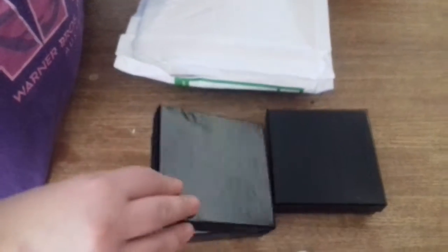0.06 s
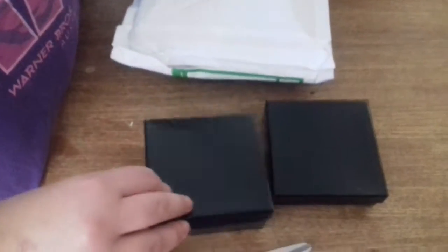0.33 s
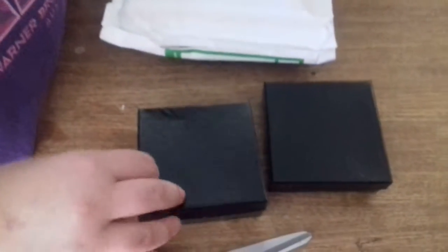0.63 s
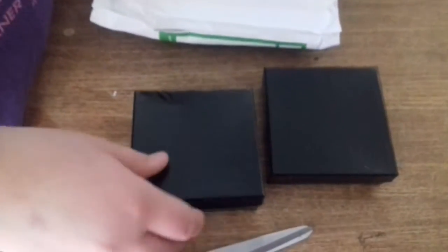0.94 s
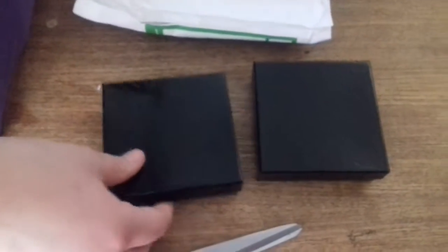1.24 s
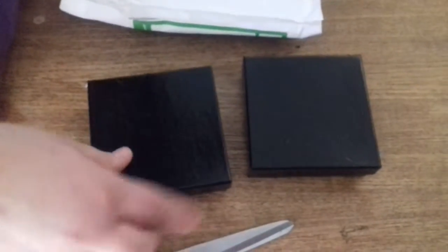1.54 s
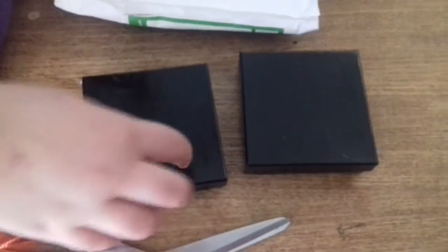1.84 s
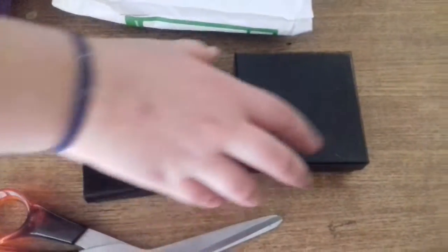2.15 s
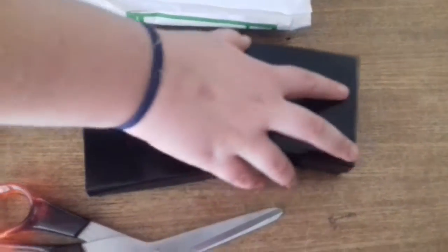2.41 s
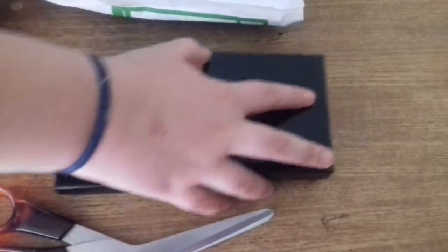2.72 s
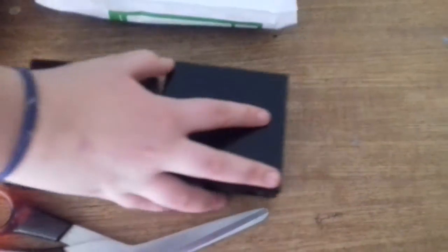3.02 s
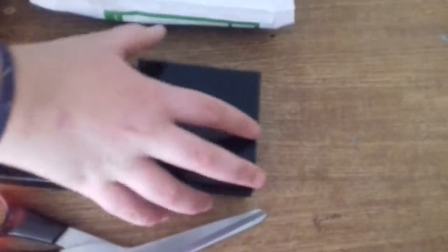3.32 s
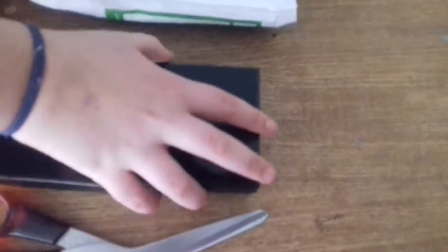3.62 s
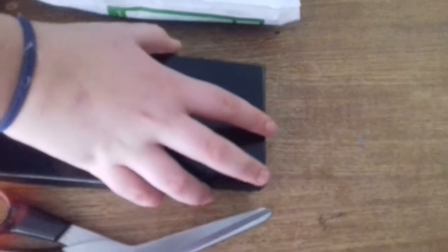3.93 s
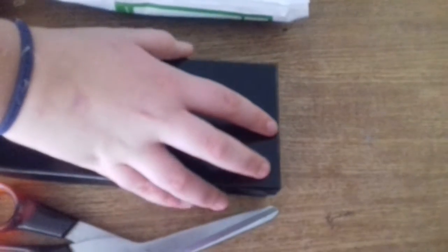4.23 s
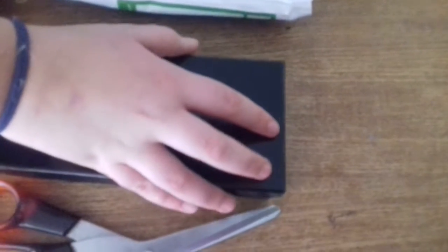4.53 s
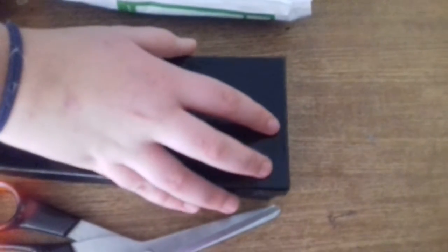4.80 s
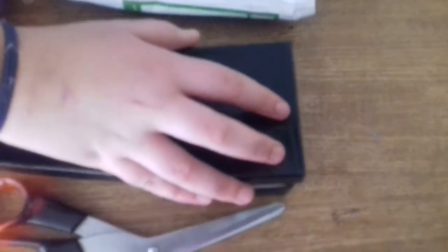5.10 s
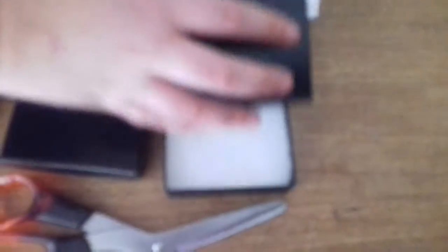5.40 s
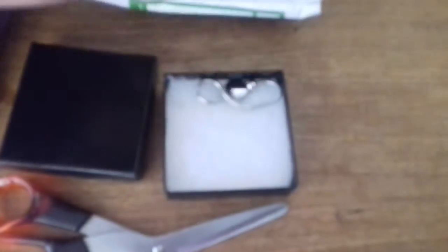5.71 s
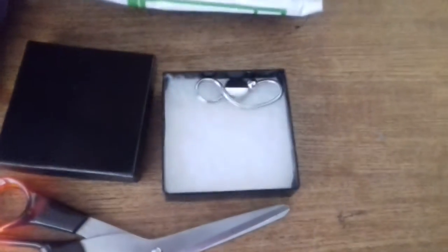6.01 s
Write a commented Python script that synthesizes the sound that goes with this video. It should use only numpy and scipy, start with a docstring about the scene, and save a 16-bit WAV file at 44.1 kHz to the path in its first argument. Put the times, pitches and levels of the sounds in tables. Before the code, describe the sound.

Small cardboard boxes are handled on a wooden table, close to the microphone, over a faint room drone and hiss. In the first 0.8 seconds a lid is pressed shut with a quick run of dry clicks and short rasps, strongest near 0.4 seconds. From about 1.3 to 2 seconds come soft, hollow taps and low rubbing. Between 2.3 and 3.7 seconds fingers slide faintly over the card, with scattered light taps. Small knocks follow from 4 seconds, with a firm hollow one at 4.3 and a softer one near 4.8. At about 5.2 seconds the second lid pops off with a tight cluster of clicks, the loudest moment, and a brief scrape. A few very faint ticks trail off by around 6 seconds. Every contact is short and damped, with little echo.

```python
"""Two small cardboard jewelry boxes, handled on a wooden table close to a near-mono camera microphone.
A lid is pressed shut, fingers tap and rub the card, and the second lid is worked loose until it pops off.
Every contact rings the same damped card panels: hardness tilts the sound and the struck spot rings
above the rest. Sliding card rasps in tiny slips. Behind it all, a quiet room drones under faint hiss."""
import sys
import numpy as np
from scipy import signal
from scipy.fft import rfft, irfft, next_fast_len
from scipy.io import wavfile
from scipy.ndimage import map_coordinates

SR = 44100
rng = np.random.default_rng(int(sys.argv[2]) if len(sys.argv) > 2 else 0)


def waveform_to_disk(signal):
    """Save audio, clipped to [-1, 1], as 16-bit WAV at the path in sys.argv[1]."""
    frames = np.transpose(np.atleast_2d(signal))
    scaled = np.clip(frames, -1, 1) * 32767
    samples = np.round(scaled).astype(np.int16)
    wavfile.write(sys.argv[1], SR, samples)


N = 275681


def amp(db):
    """Decibels to gain."""
    return 10 ** (np.asarray(db) / 20)


def unit(x):
    """Scale to rms 1."""
    return x / np.sqrt(np.mean(x ** 2) + 1e-20)


def along(points, hz):
    """Read (Hz, value) points on a log axis."""
    point_hz, values = np.transpose(points)
    return np.interp(np.log(hz + 1), np.log(point_hz + 1), values)


def hump(hz, centre_hz, octaves):
    """A bell curve of height 1 on a log axis."""
    return np.exp(-(np.log2((hz + 1) / centre_hz) / octaves) ** 2)


def filtered(x, response):
    """Zero-phase filter whose gain is response(hz)."""
    n = x.shape[-1]
    size = next_fast_len(n + 8192)
    return irfft(rfft(x, size) * response(np.fft.rfftfreq(size, 1 / SR)), size)[..., :n]


def coloured(x, spectrum):
    """Causal (minimum-phase) filter with the given (Hz, dB) gain."""
    size = next_fast_len(2 * len(x))
    gain = amp(along(spectrum, np.fft.rfftfreq(size, 1 / SR)))
    cepstrum = irfft(np.log(gain), size)
    cepstrum[1:size // 2] *= 2
    cepstrum[size // 2 + 1:] = 0
    return irfft(rfft(x, size) * np.exp(rfft(cepstrum)), size)[:len(x)]


# The quiet room at the microphone. Each row: frequency in Hz, relative noise density in dB.
ROOM_NOISE = [(12, -37), (20, -21), (27, -19), (93, -8.5), (208, -3), (290, -8), (861, -13.5), (1140, -15),
              (2700, -15.5), (5420, -33), (15600, -36.5)]
# Humps on that noise. Each row: centre in Hz, width in Hz, lift in dB.
DRONE_HUMPS = [(99.6, 5.1, 11.5), (147.9, 7.5, 11.5), (267.5, 21, 9), (870.4, 9.8, 14), (2650, 1200, 1),
               (4020, 880, 6)]
# Stereo width of the noise, humps aside. Each row: frequency in Hz, side minus mid in dB.
NOISE_WIDTH = [(60, -14), (110, -16), (200, -18.5), (380, -12.5), (700, -10.5), (1290, -8), (2380, -9.5),
               (4400, -0.5), (8120, 0), (15000, 0)]


def room_tone(level_db):
    """A steady room drone, alike in both channels, under microphone hiss that is not."""
    def drone_db(hz):
        return sum(db / (1 + (2 * (hz - centre) / width) ** 2) for centre, width, db in DRONE_HUMPS)

    mid = filtered(rng.standard_normal(N), lambda hz: amp(along(ROOM_NOISE, hz) + drone_db(hz)))
    side = filtered(rng.standard_normal(N), lambda hz: amp(along(ROOM_NOISE, hz) + along(NOISE_WIDTH, hz)))
    return amp(level_db) * unit(np.array([mid + side, mid - side]))


# Card sliding on card, heard close. Each row: frequency in Hz, relative noise density in dB.
CARD_RASP = [(120, -41), (400, 1), (850, -6), (1150, -4), (1700, -6.5), (2700, -4), (3400, -9.5),
             (4400, -17), (5100, -25.5), (7000, -30.5), (10000, -36.5), (15000, -39)]


def grazes(level_db, rise_s):
    """The surfaces graze just before they meet, leading into each contact with a short rising rasp."""
    out, n = np.zeros(N + SR), int(rise_s * SR)
    for start, *_ in CONTACTS:
        rasp = unit(filtered(rng.standard_normal(SR // 16), lambda hz: amp(along(CARD_RASP, hz))))
        out[round(start * SR) - n:][:n] += amp(level_db) * rasp[:n] * np.linspace(0, 1, n)
    return out[:N]


# The modes of a box. Each row: frequency in Hz, relative level in dB, seconds to fall by 60 dB.
BOX_MODES = [(235, -11, 0.19), (427, 4.5, 0.018), (655, -13, 0.058), (748, -5.5, 0.042), (1030, -11, 0.027),
             (1330, -4, 0.008), (1410, 8, 0.016), (2040, -13, 0.035), (2430, -24, 0.017),
             (2720, -4.5, 0.026), (2900, 6, 0.016), (3650, 2.5, 0.026), (4330, 1.5, 0.033)]
# Card passes little treble. Each row: frequency in Hz, gain in dB.
CARD_RESPONSE = [(60, -27), (250, 1), (1000, 3.5), (1300, 1), (1650, -4), (2200, 10), (2750, 2), (3250, -5),
                 (3750, -9), (4400, -13.5), (5100, -18), (6800, -23.5), (9000, -40), (15000, -40)]


def box_ring(t, spot_hz, spot_db, spot_t60, detune, scatter_db, crack_db, crunch_db, crunch_t60):
    """One blow on a box: a crack, a crunch of fibres, damped modes and the ring of the struck spot."""
    hz, db, t60 = np.transpose(BOX_MODES)[:, :, None]
    shift, strength = rng.standard_normal((2, len(BOX_MODES), 1))  # the grip alters each mode a little
    envelopes = amp(db + scatter_db * strength - 60 * t / t60)
    modes = envelopes * np.cos(2 * np.pi * hz * (1 + detune * shift) * t)
    spot = amp(spot_db - 60 * t / spot_t60) * np.cos(2 * np.pi * spot_hz * t)
    crack = amp(crack_db) * (t == 0)
    crunch = amp(crunch_db - 60 * t / crunch_t60) * rng.standard_normal(len(t))
    return coloured(modes.sum(axis=0) + spot + crack + crunch, CARD_RESPONSE)


def near_reflections(x, level_db, t60):
    """Hand, table and nearby things answer within milliseconds, differently for each place of contact."""
    t = np.arange(len(x)) / SR
    echoes = rng.standard_normal(len(t)) * amp(-60 * t / t60) * (t > .004)
    return x + amp(level_db) * signal.fftconvolve(x, echoes / np.linalg.norm(echoes))[:len(x)]


# The box's registers: thud, hollow, panel, lid, rim, click. Each row: low and high edge in Hz.
REGISTER_EDGES = [(150, 550), (550, 900), (900, 1700), (1700, 3300), (3300, 4700), (4700, 15000)]
# A usual blow in those registers; a heavy one flexes the panels but crushes the card, dulling its click.
# Each row: centre in Hz, relative level in dB, dB gained per dB of extra force.
REGISTER_BALANCE = [(344, -11.5, -0.13), (700, -11.5, 0.28), (1185, -8, 0.41), (2480, -6, 0.29),
                    (4000, -19.5, 0.07), (7000, -29.5, -0.42)]
# Fingers, lids and table meeting close to the microphone; a spot that no finger damps rings out.
# Each row: start in seconds, relative level in dB, resonance of the struck spot in Hz,
# its relative ring in dB, hardness in dB per octave.
CONTACTS = [(0.0413, -30, 1500, 11, 2.0), (0.0584, -36.5, 1584, 20, 0.0), (0.1326, -39.5, 1540, 9, -1.0),
            (0.142, -35.5, 2070, 6, -0.5), (0.153, -45, 2120, -1, 4.5), (0.1613, -34, 2200, 1, 4.5),
            (0.3806, -30, 1160, 4, 3), (0.385, -30, 2320, 3, 0), (0.4149, -40, 2410, 1, 1),
            (0.4716, -44.5, 754, 5, -2), (0.4925, -45.0, 970, 10, -3), (0.5221, -45.0, 2350, 14, -4.5),
            (0.5292, -30.5, 1480, -2, -1.0), (0.7403, -34.5, 2830, 7, 5.5), (0.759, -39, 2030, 5, -2.5),
            (1.0644, -49, 2920, 6, -0.5), (1.279, -49, 700, 1, -4), (1.315, -50.0, 630, 11, 2),
            (1.355, -51.5, 680, 6, -2), (1.4273, -39.5, 724, 21, 2.5), (1.433, -39.5, 700, 3.5, -1.0),
            (1.5154, -46.5, 684, 0, -4.5), (1.5582, -49.5, 1400, 8, -0.5), (1.5875, -50.5, 775, 13, 3.5),
            (1.6059, -48, 552, 8, 1.5), (1.7108, -50.5, 1410, 4, -2.5), (1.7648, -35, 1420, 3, -2),
            (1.9464, -43.5, 2600, 6.5, 2.5), (1.9787, -47, 1430, 18, 1.5), (2.3713, -43.5, 805, 4, -3),
            (2.3931, -47, 1104, 11, -2.5), (2.6938, -45, 655, -1.5, -2), (2.732, -44, 1124, 15, 0),
            (2.8077, -41.0, 1160, 7.5, 1.5), (2.927, -41, 1190, 9, 2.5), (3.2921, -54.5, 1410, 16, -2.5),
            (3.5635, -49.0, 1110, 9, 0), (3.5927, -39.5, 1146, 1.5, -1.5), (3.6736, -52, 616, 8.5, 1.5),
            (4.0616, -44.5, 2140, 0.5, -0.5), (4.1191, -40, 766, 7.5, -2), (4.2429, -40.5, 785, 12, -4),
            (4.2575, -45, 2170, 3, -1), (4.3179, -26.5, 748, 12, -2), (4.32, -31, 1295, 14.5, -3.5),
            (4.7582, -41, 836, 17, -5), (4.805, -53.5, 820, 18, -4), (5.1398, -36.5, 980, 10, 2.5),
            (5.167, -22.5, 1010, 3, 1.5), (5.175, -28.5, 2670, 23, -2), (5.2271, -41.5, 2400, 1, 3),
            (5.3211, -52.5, 2350, 6, 0.5), (5.5526, -54.5, 970, 11, 1), (5.708, -52.0, 1070, 6, 2),
            (5.7394, -48.5, 1110, 2, 1.5)]


def contacts(gain_db, usual_blow_db, spot_db, spot_octaves, snap_db, snap_growth):
    """Hard contacts tilt bright, soft ones dull; heavy blows snap, light ones mostly crunch."""
    out, t = np.zeros(N + SR), np.arange(SR // 8) / SR
    bands = [signal.butter(3, edges, 'bandpass', fs=SR, output='sos') for edges in REGISTER_EDGES]
    lead, attack = SR // 100, int(.012 * SR)
    centre_hz, balance_db, growth = np.transpose(REGISTER_BALANCE)
    for start, db, spot_hz, ring_db, hardness in CONTACTS:
        force_db = db - usual_blow_db
        octaves = np.log2(centre_hz / spot_hz)
        lift_db = ring_db * np.exp(-(octaves / spot_octaves) ** 2)  # the spot lifts registers near it
        shares = amp(balance_db + growth * force_db + hardness * octaves + lift_db)
        ring = box_ring(t, spot_hz, spot_db + ring_db, spot_t60=0.019, detune=0.019, scatter_db=1.5,
                        crack_db=snap_db + snap_growth * force_db, crunch_db=16, crunch_t60=0.018)
        ring = np.pad(near_reflections(ring, level_db=-9.5, t60=0.053), (lead, 0))
        blow = sum(share * unit(signal.sosfiltfilt(band, ring)) for band, share in zip(bands, shares))
        blow /= blow[lead:][:attack].std()  # a blow's level counts over its first moments
        out[round(start * SR) - lead:][:len(blow)] += amp(db + gain_db) * blow
    return out[:N]


# Card or skin sliding over card, just in front of the microphone.
# Each row: start in seconds, length in seconds, level in dB, pitch of the rasp in Hz.
STROKES = [(.135, 0.029, -43.5, 2480), (0.17, 0.072, -56.5, 3300), (0.353, .022, -50, 2660),
           (.386, 0.041, -41, 2750), (0.413, .23, -56.5, 2660), (0.736, .014, -41, 2900),
           (1.333, .12, -57, 755), (1.412, 0.018, -49.5, 720), (1.491, 0.15, -60.5, 655),
           (1.719, 0.046, -51, 590), (2.347, 0.098, -57.5, 2500), (2.637, 0.041, -49.5, 2090),
           (2.744, 0.032, -51, 2600), (2.581, 0.5, -54.5, 2900), (2.952, 0.41, -56.5, 2800),
           (4.285, .027, -55, 3680), (4.315, 0.0089, -41.5, 3680), (4.321, 0.047, -52, 2150),
           (4.7, 0.028, -59, 3580), (5.133, 0.023, -42.5, 2500), (5.167, 0.035, -47, 1030),
           (5.17, 0.024, -45, 2650), (5.225, 0.044, -49.5, 2340), (5.19, .11, -57, 4100)]


def strokes(slips_per_s, slip_db, panel_db, wander_s, rim_hz, rim_db, uneven_db, catches_per_s):
    """Sliding card catches in tiny slips that sound one panel resonance and the edge of the lid."""
    out = np.zeros(N + SR)
    for start, length, db, rasp_hz in STROKES:
        n = int(length * SR)
        slips = rng.standard_normal(SR) * (1 + amp(slip_db) * (rng.random(SR) < slips_per_s / SR))
        catches = map_coordinates(rng.standard_normal(size=256), [np.arange(n) * catches_per_s / SR])
        pressure = amp(uneven_db * catches)
        prominence_db = panel_db / (1 + length / wander_s)  # a long stroke favours its panel less

        def response(hz):
            panel = prominence_db * hump(hz, rasp_hz, octaves=0.26)
            rim = rim_db * hump(hz, rim_hz, octaves=0.13)
            return amp(along(CARD_RASP, hz) + panel + rim)

        rasp = unit(filtered(slips[:n] * pressure, response))
        out[round(start * SR):][:n] += amp(db) * rasp * signal.windows.tukey(n, .6)
    return out[:N]


# Spells of fingering, faint even this close.
# Each row: start in seconds, length in seconds, lowest tick level in dB.
FIDGET_SPELLS = [(0, 6.2, -72), (1.249, 0.42, -71)]


def fidgets(ticks_per_spell, spread_db):
    """Fingertips shifting their grip make faint ticks at random moments of each spell."""
    out, t = np.zeros(N + SR), np.arange(SR // 16) / SR
    for start, length, db in FIDGET_SPELLS:
        for when, size in rng.random((ticks_per_spell, 2)):
            tick = box_ring(t, spot_hz=2500, spot_db=-19, spot_t60=0.014, detune=.04, scatter_db=6.0,
                            crack_db=35, crunch_db=18, crunch_t60=0.027)
            out[int((start + when * length) * SR):][:len(t)] += amp(db + spread_db * size) * unit(tick)
    return out[:N]


# The room around the table. Each row: frequency in Hz, seconds to fall by 60 dB.
ROOM_DECAY = [(200, 0.36), (1000, 0.18), (3000, 0.25), (10000, 0.39)]


def room_reverb(x, tail_db):
    """The walls add a short tail, whose midrange dies first."""
    hz, t, noise = signal.stft(rng.standard_normal(SR // 2), SR, nperseg=256)
    decay = amp(-60 * t / along(ROOM_DECAY, hz)[:, None])
    _, tail = signal.istft(noise * decay, SR, nperseg=256)
    tail *= np.clip(np.arange(len(tail)) / SR / 0.006, 0, 1)  # builds up over 6 ms
    return x + amp(tail_db) * signal.fftconvolve(x, tail / np.linalg.norm(tail))[:N]


def scene():
    """The boxes are close and straight ahead of the microphone; only the room tone has width."""
    handling = contacts(gain_db=-0.5, usual_blow_db=-40, spot_db=7, spot_octaves=0.55,
                        snap_db=21.5, snap_growth=0.47)
    handling += grazes(level_db=-57.5, rise_s=.018)
    handling += fidgets(ticks_per_spell=14, spread_db=9.5)
    handling += strokes(slips_per_s=700, slip_db=11.5, panel_db=15.5, wander_s=0.12,
                        rim_hz=4130, rim_db=7.0, uneven_db=1.9, catches_per_s=120)
    return room_reverb(handling, tail_db=-12) + room_tone(level_db=-56.5)


def record(dry):
    """The camera keeps nothing above its band limit; its converter sits slightly off zero."""
    return filtered(dry, lambda hz: hz < 15750) - .0006


dry = scene()
out = record(dry)
waveform_to_disk(out)
```